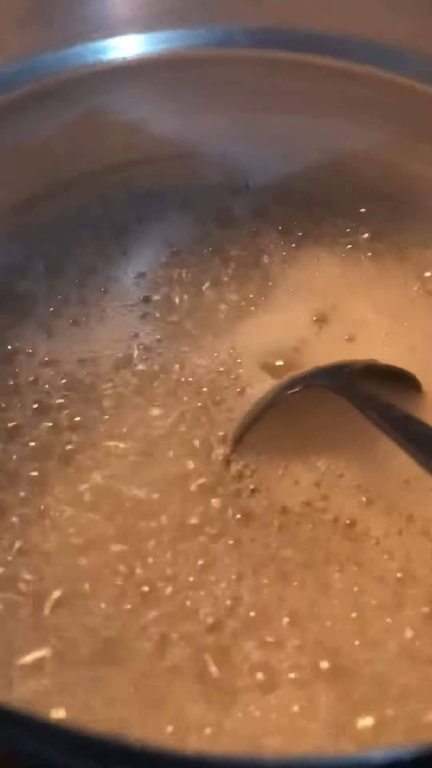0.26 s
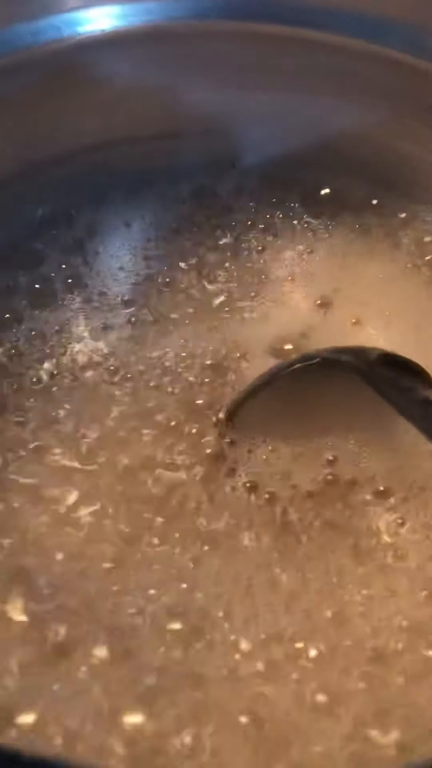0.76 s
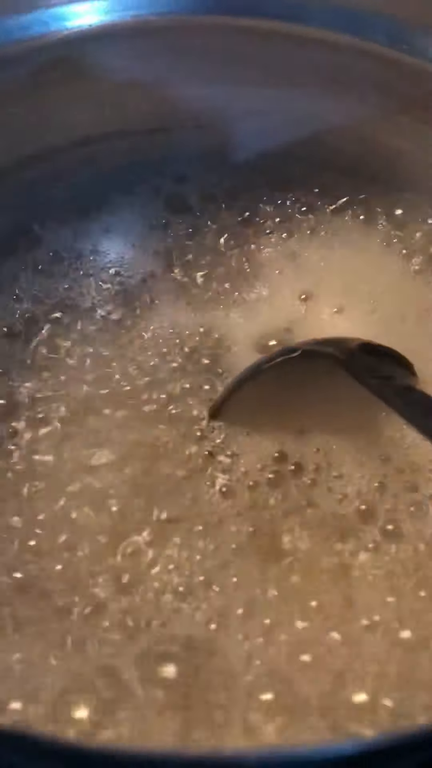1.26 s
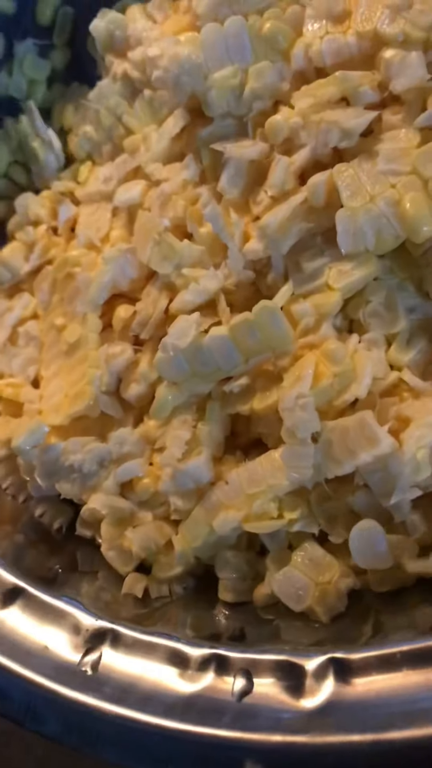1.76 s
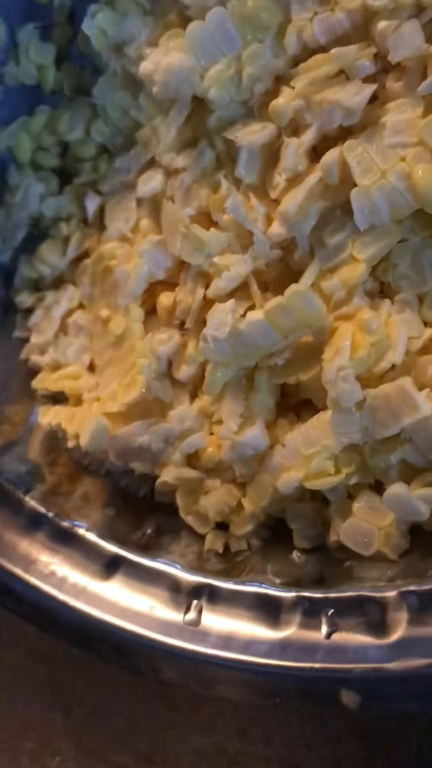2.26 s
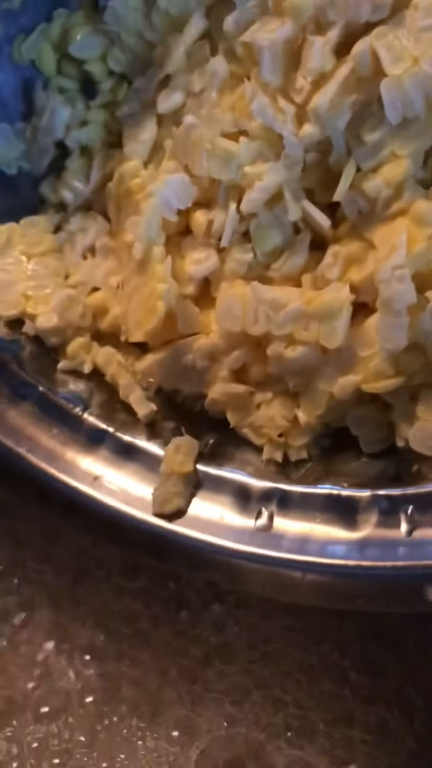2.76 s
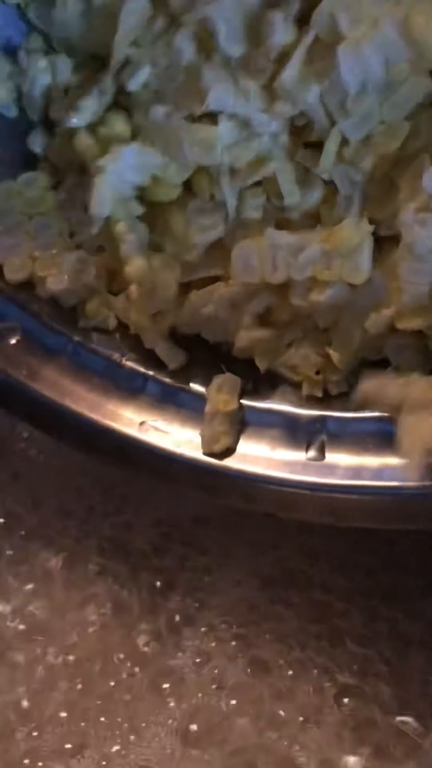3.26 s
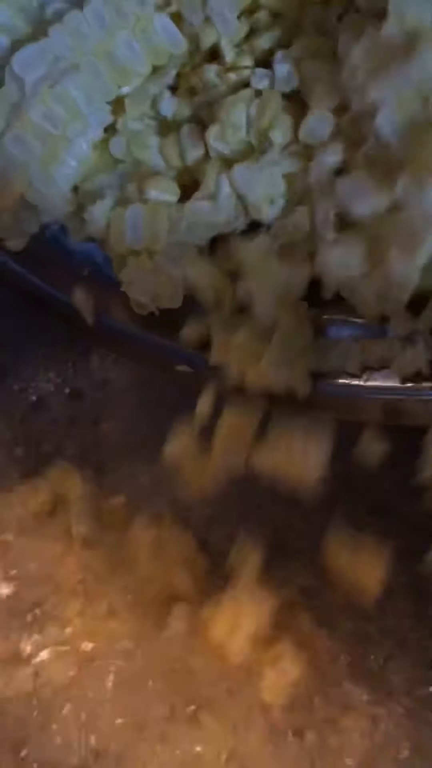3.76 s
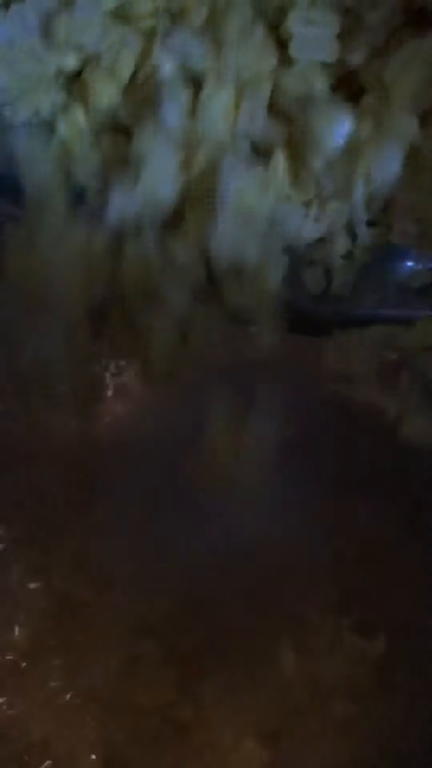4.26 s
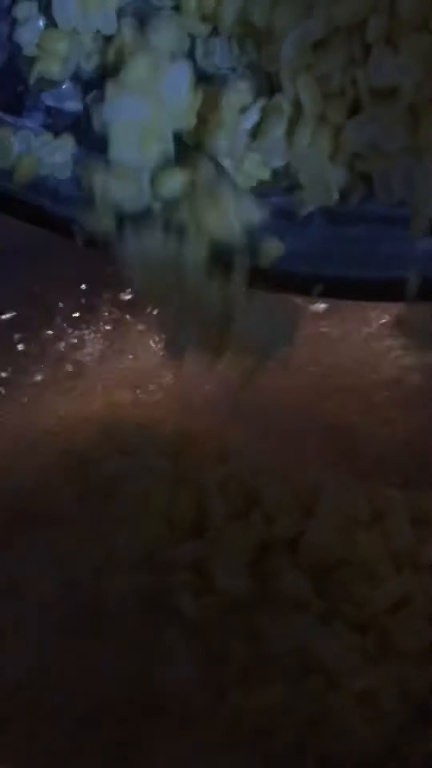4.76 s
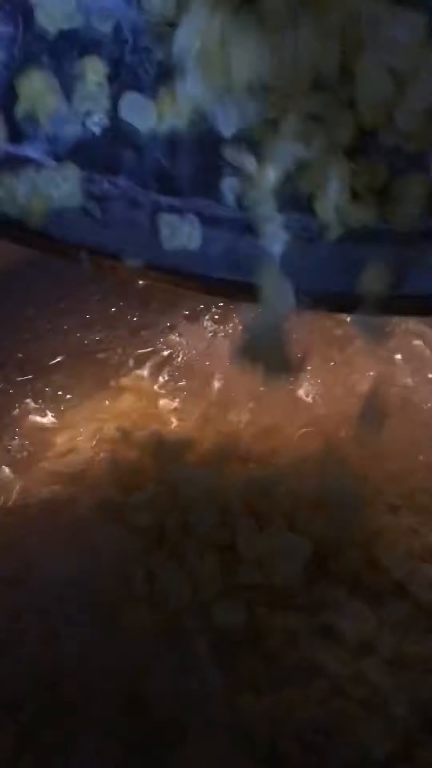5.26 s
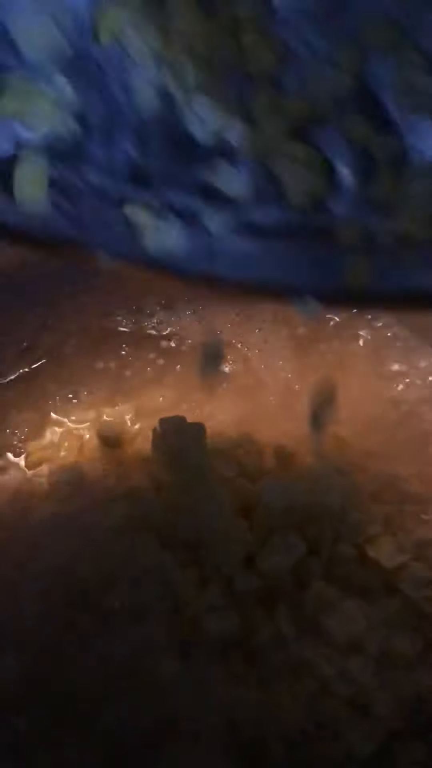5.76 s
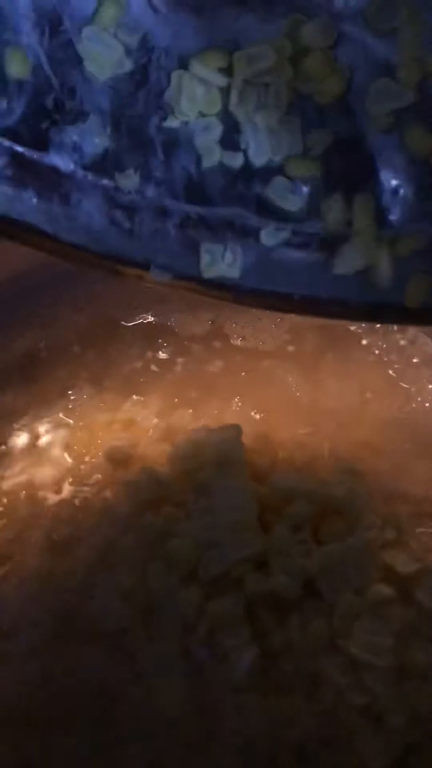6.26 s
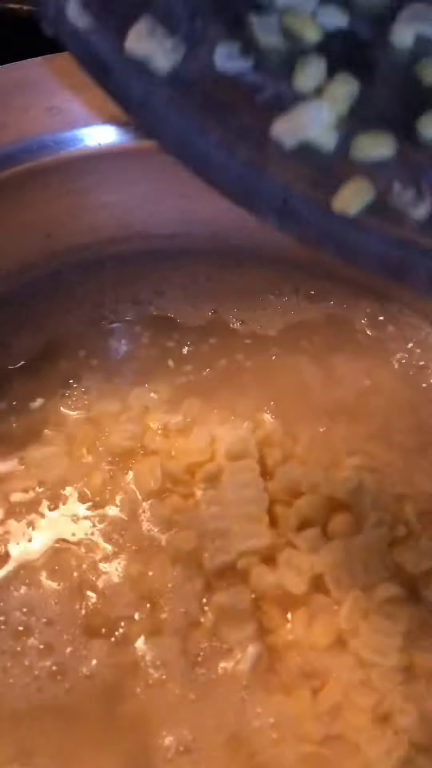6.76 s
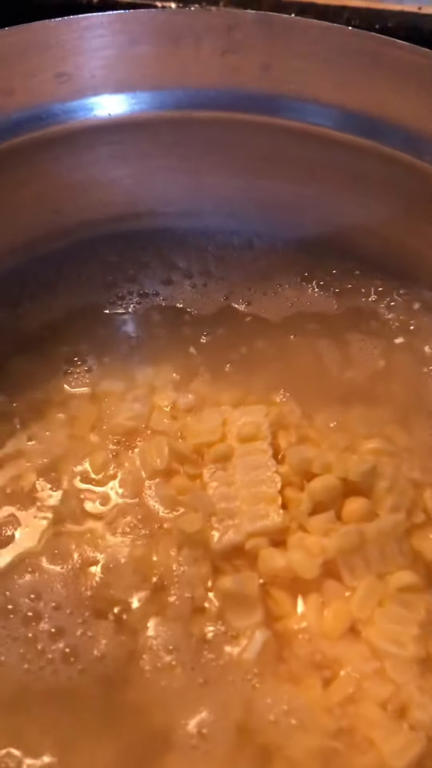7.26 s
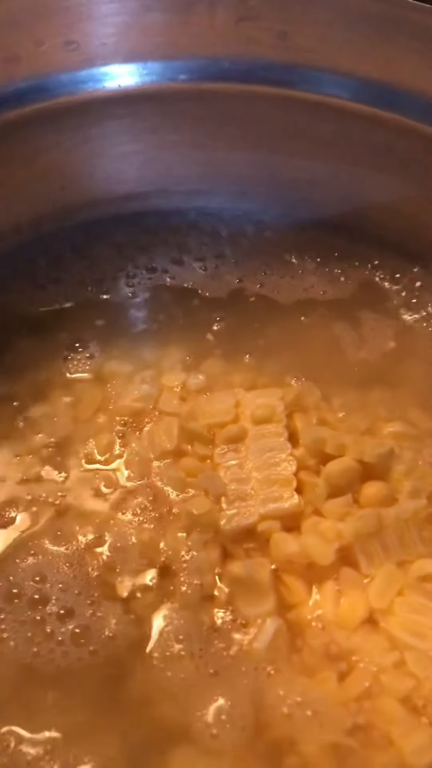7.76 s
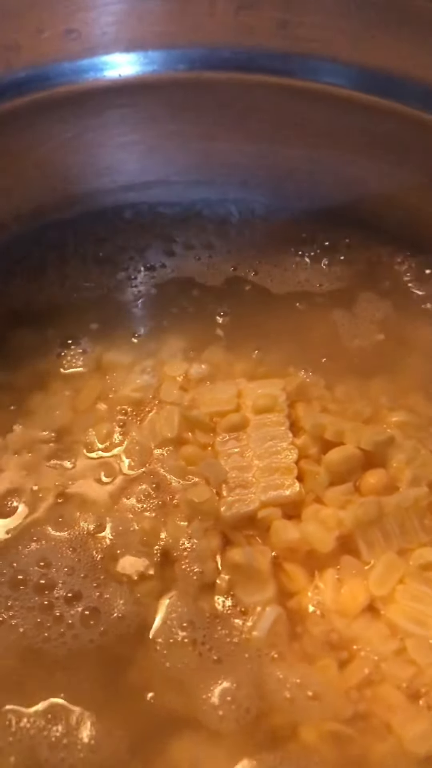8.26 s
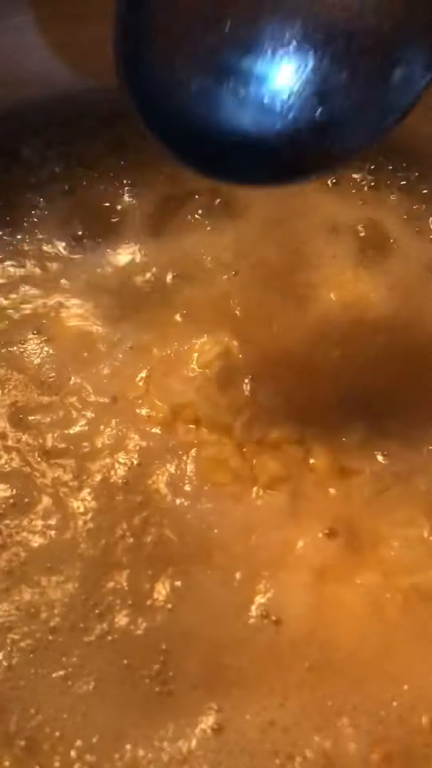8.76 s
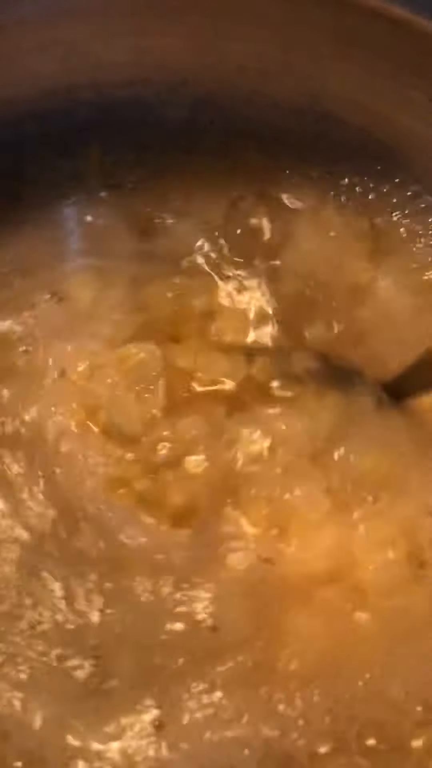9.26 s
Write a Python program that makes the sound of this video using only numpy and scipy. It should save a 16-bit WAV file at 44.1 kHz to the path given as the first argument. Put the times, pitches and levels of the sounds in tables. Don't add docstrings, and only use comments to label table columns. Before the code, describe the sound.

Water simmers and fizzes in a steel pot over a rumbling burner; corn plops in, an emptied metal bowl clangs three times on the rim, a ladle gulps.

```python
import sys
import numpy as np
from scipy import signal
from scipy.fft import rfft, irfft
from scipy.io import wavfile
from scipy.ndimage import uniform_filter1d, map_coordinates

SR = 44100
rng = np.random.default_rng(int(sys.argv[2]) if len(sys.argv) > 2 else 0)


def digitize_waveform(pressure):
    field = np.atleast_2d(pressure).T
    bounded = np.clip(field, -1, 1)
    quanta = np.round(bounded * 32767).astype(np.int16)
    wavfile.write(sys.argv[1], SR, quanta)


def field_ratio(decibels):
    return 10 ** (np.asarray(decibels, dtype=float) / 20)


N = 419832

# time in seconds, place
POT_COVER = [(0, 1), (1.33, -0.5), (1.34, 1.5), (2.6, 1.5), (3.3, 2.5), (4.3, 2), (5.2, 2.5), (6.4, 3),
             (6.8, 3.35), (7.2, 4), (8.5, 4), (8.55, 4.5), (9.1, 5), (9.52, 5)]
# frequency in Hz, density in dB per Hz.
OPEN_COLOUR = [(240, -45), (400, -29), (470, -22), (555, 1), (630, -26), (708, 3), (800, -9), (1300, -11.5),
               (2100, -8.5), (2600, -7), (3340, -5), (4970, -10), (6500, -13.5), (8450, -38), (14300, -120)]
FULL_BOWL_COLOUR = [(240, -54), (400, -19), (542, -10.5), (778, -4.5), (864, -13), (1070, -18),
                    (1280, -12.5), (1800, -17.5), (1950, -16.5), (2560, -13.5), (4800, -11), (5460, -15),
                    (6500, -9), (8450, -51), (14300, -120)]
TIPPING_COLOUR = [(240, -56), (400, -15), (548, 0.5), (742, -4), (971, -12), (1090, -17.5), (1530, -5.5),
                  (2050, -8), (2300, -10), (4420, -8.5), (4860, -16), (5330, -8.5), (6500, -16.5),
                  (8450, -37), (14300, -120)]
EMPTY_BOWL_COLOUR = [(240, -41), (400, -26), (530, -0.5), (680, -7), (900, -4.5), (1020, -9.5), (1250, -19),
                     (1500, -9), (1740, -10), (1950, -17.5), (2150, -14.5), (2300, -6), (2440, -4),
                     (3850, -4.5), (5460, -10), (6500, -12), (8450, -34), (14300, -120)]
FILLED_COLOUR = [(240, -45), (400, -26), (480, -7.5), (560, -8.5), (720, -4.5), (1100, -8.5), (1480, -8),
                 (1680, -1.5), (1900, -7), (2200, -9.5), (2480, -0.5), (2750, -5), (3300, -0.5),
                 (5000, -5.5), (6500, -8.5), (8450, -16), (14300, -120)]
STIRRED_COLOUR = [(240, -50), (400, -28), (523, -2.5), (623, -6.5), (717, -1.5), (1310, -8), (1820, -0.5),
                  (2530, -2), (3050, -4), (3380, -4.5), (6500, -9), (8450, -39), (14300, -120)]
# frequency in Hz, density in dB per Hz.
FIZZ_COLOUR = [(3240, -38), (5500, -10.5), (7060, -6), (7590, -8.5), (8640, -4), (10400, -8.5),
               (11700, -2.5), (14800, 2.5), (15400, 6), (16000, -13.5)]
# frequency in Hz, density in dB per Hz.
FLAME_COLOUR = [(15, -40), (25, -2), (48, -4.5), (119, -1), (139, -1.5), (161, -16), (223, -8.5), (281, -9),
                (353, -17), (380, -18), (450, -32.5), (580, -53), (990, -120)]
# frequency in Hz, density in dB per Hz.
SHADED_FLAME_COLOUR = [(15, -52), (25, -4), (97, -23), (125, 2), (171, -14), (258, -14), (288, -10),
                       (409, -31.5), (450, -23), (580, -48), (990, -120)]
# time in seconds, level in dB.
WATER_LEVEL = [(0, -51), (0.7, -49), (1.32, -46.5), (1.35, -56.5), (1.7, -55.5), (2.4, -54.5),
               (2.72, -53.5), (2.75, -52), (3.5, -48.5), (4.3, -50), (5.3, -52), (5.72, -50.5), (6.3, -50),
               (6.75, -51.5), (7.4, -47.5), (8.5, -48), (8.56, -47.5), (9.52, -44.5)]
# place as in the cover, level in dB.
FOAM_OVER_SIMMER = [(-.5, 2), (.5, 2.5), (1.5, 2.5), (2.5, 3.5), (3, 2.5), (3.4, 5.5), (4, 2.5), (5, 5)]
# place as in the cover, level in dB.
FLAME_LEVEL = [(-.5, -47), (.5, -50.5), (1.5, -56), (2, -49.5), (3, -50.5), (4, -51), (5, -49)]
# time in
# seconds, change # in dB (negative for a lull), length in seconds.
SHAKE_SWELLS = [(0.237, 2.5, 0.12), (2.63, 3, 0.14), (3.658, 2.5, 0.1), (3.763, 5, 0.18), (4.074, 3, 0.075),
                (4.195, -1, 0.037), (4.3, 2, 0.073), (4.508, 5.5, 0.14), (4.77, 7, 0.1), (5.036, 6.5, 0.13),
                (5.354, 2.5, .06), (5.478, 3, 0.14), (3.38, -2.5, .07), (8.41, 3, .07), (8.647, 3, 0.15),
                (8.985, -1, .08), (9.145, 1.5, 0.034)]
# start in seconds, peak in dB, thud in dB, crack in dB, favoured note in Hz.
RIM_KNOCKS = [
    (5.7483, -14.5, -6, -1, 1530),
    (5.7664, -5, -15, -9.5, 1448),
    (5.7894, -30, -5, -20, 1480),
    (5.9325, -9, -27, -3, 1496),
    (5.9404, -4, -8, -6, 1600),
    (5.9645, -34, -15, -20, 1470),
    (6.1203, -11, -21, -10, 1590),
    (6.1253, -12.5, -4, -6.5, 1450),
    (6.144, -26, -2, -20, 2330),
]
# frequency in Hz, level in dB, t60 in seconds.
BOWL_WALL = [(1374, -3, 0.056), (1496, 5, 0.05), (1560, -4, 0.065), (1645, -3.5, 0.034), (2240, -4, 0.044),
             (2330, 3, 0.026), (2590, -5, 0.038), (3324, -6, 0.037), (3700, 1, 0.016), (4040, 1, 0.015),
             (4600, -6, 0.025), (6750, 0, 0.019), (7450, 1.5, 0.016)]
# frequency in Hz, level in dB, t60 in seconds.
BOWL_RIM = [(385, -4.5, 0.17), (498, 4, 0.031), (546, -1.5, 0.11), (622, 1.5, 0.026), (740, -3, 0.028),
            (986, 4, 0.046), (1104, 6, 0.034)]
# frequency in Hz, level in dB, t60 in seconds.
POT_MODES = [(68.4, -13.5, 0.29), (127.4, -18, 0.27), (174, -1, 0.071), (200.4, 2, 0.1), (272, -4, 0.062)]
# start in seconds, peak in dB, frequency in Hz, t60 in seconds.
BOWL_PEALS = [(5.7495, -24, 1500, .02), (5.7515, -20, 1650, .06), (5.7665, -18, 4030, .012),
              (5.9325, -17, 4350, .012), (5.9405, -22, 388, .09), (5.9435, -20, 205, .08),
              (5.782, -36, 560, .08), (5.9405, -20, 545, .05), (5.9415, -21, 7200, .015),
              (5.9415, -21, 6000, .012), (5.978, -31, 540, .06), (5.7495, -27, 2700, .025),
              (5.7665, -18, 530, .035), (5.767, -13, 1500, .03), (5.767, -17, 1770, .015),
              (5.7705, -10.5, 1380, 0.048), (5.8, -42, 2500, .12), (5.815, -39, 1485, .08),
              (5.795, -34, 1450, .05), (5.9345, -13, 1560, .035), (5.934, -20, 1100, .03),
              (5.9422, -7, 1575, .022), (5.941, -17, 2670, 0.05), (5.9438, -18, 1750, 0.021),
              (5.9497, -18, 1420, 0.039), (5.965, -27, 1450, .05), (5.99, -35, 1560, .08),
              (6.002, -37, 1500, .12), (5.96, -34, 2620, .08), (6.121, -13.5, 1568, 0.038),
              (6.122, -21, 962, .045), (6.135, -28, 1480, .03), (6.143, -25, 1500, .04),
              (6.157, -36, 1500, .14), (6.19, -50, 2550, .08), (6.236, -45, 1480, 0.092),
              (6.245, -47, 960, .08), (6.41, -49, 1480, 0.1)]
# start in seconds, peak in dB, frequency in Hz,
# t60 in seconds.
POT_THROBS = [(5.782, -20.5, 126, 0.22), (5.835, -26, 124, .15), (5.949, -16, 123.6, 0.15),
              (6.06, -33, 110.6, 0.22), (6.128, -26, 66, 0.21), (6.205, -34, 121, .15),
              (3.745, -32.5, 129, .1), (3.82, -37, 129, 0.093), (4.509, -40, 130, .08),
              (4.59, -39, 194, 0.094), (9.225, -35.5, 126, 0.14), (9.285, -42, 125, 0.13)]
# start in seconds, tick in dB, slap in dB, slap frequency in Hz.
KERNEL_HITS = [(2.68, -44, -43, 1000), (4.0013, -28, -36, 5000), (4.446, -34, -42, 1600),
               (4.481, -34, -42, 2580), (3.7108, -22, -45, 8000), (3.7522, -32, -50, 8000),
               (3.724, -36, -40, 6000), (3.625, -22, -43, 5000), (3.6398, -24, -35.5, 1670),
               (3.6646, -35, -46, 1620), (3.7022, -31, -37, 1940), (3.709, -20, -44, 8000),
               (3.713, -28, -27.5, 4080), (3.721, -42, -36, 2300), (3.7494, -23, -46, 8060),
               (3.7614, -29, -45, 2970), (3.7824, -27, -32, 5080), (3.7874, -24, -36, 8370),
               (3.795, -19, -33, 4000), (3.822, -31, -48, 1850), (3.8556, -25, -43, 6230),
               (3.8612, -29, -42, 2450), (3.8806, -27, -56, 2320), (3.958, -36, -38, 2800),
               (4.0035, -14, -27.5, 3000), (4.0043, -30, -27, 7000), (6.183, -40, -39, 8000),
               (4.1045, -26, -39, 5570), (4.1154, -40, -43, 1530), (4.497, -29, -50, 2560),
               (4.5232, -16, -33, 1670), (4.556, -27, -46, 1510), (4.568, -25, -33, 3240),
               (5.8568, -34, -39, 7000), (6.214, -39, -47, 2500), (9.157, -32.5, -38, 1500),
               (9.17, -38, -41, 2200), (3.644, -36, -39, 2200), (3.686, -38, -41, 2000),
               (3.692, -38, -41, 2600), (3.727, -40, -41, 1800), (3.745, -40, -43, 2400),
               (3.766, -40, -43, 2500), (4.097, -36, -38, 5000), (4.111, -36, -42, 5500),
               (9.185, -40, -42, 2300)]
# centre in seconds, level in dB,
# length in seconds, centre frequency in Hz.
SPLASH_BURSTS = [(2.686, -52, 0.022, 680), (3.611, -51, 0.011, 550), (3.639, -43, 0.014, 550),
                 (3.683, -48, 0.015, 580), (3.714, -45, 0.016, 640), (3.795, -47, .01, 696),
                 (3.866, -48, .015, 590), (3.897, -48.5, .008, 470), (4.009, -47, 0.0088, 580),
                 (4.114, -47, .008, 570), (4.365, -49, 0.021, 650), (4.454, -53, 0.018, 1900),
                 (4.525, -46, .01, 680), (4.9, -47, 0.018, 550), (4.72, -56, 0.018, 540),
                 (5.0, -57, .01, 600), (5.195, -49, 0.0088, 700), (9.174, -50, 0.015, 920),
                 (9.418, -56, 0.053, 570), (3.697, -55, .07, 2100), (3.72, -51, 0.11, 610),
                 (9.32, -55, .04, 2110), (9.24, -55, 0.016, 260), (9.185, -44.5, 0.018, 286),
                 (4.521, -53.5, 0.073, 4100), (2.69, -52, .015, 320), (2.69, -56, .015, 1500),
                 (9.165, -50, .018, 2300), (9.155, -50, .006, 800), (9.49, -56, .04, 250),
                 (9.44, -53.5, .08, 1930), (9.12, -53, .04, 3100), (3.64, -52, .015, 2500)]
# start in seconds, peak in dB, frequency in Hz,
# decay in cycles.
LONE_TONES = [(0.138, -30, 74, 1.3), (1.64, -50.5, 1260, 32), (5.286, -45, 1490, 30),
              (5.0067, -42, 2360, 14), (5.3514, -44, 2690, 14), (4.8, -43, 2670, 14),
              (5.543, -45, 2690, 14), (6.327, -47, 1720, 16), (5.196, -44, 1600, 10),
              (5.148, -44, 3000, 8), (5.193, -41, 3000, 8), (4.78, -46, 1700, 20), (4.835, -49, 1500, 40),
              (9.46, -42, 690, 8), (9.5, -44, 780, 5), (5.35, -47, 1500, 20), (5.415, -47.5, 1480, 55),
              (4.004, -28.5, 1760, 5.7), (3.9575, -33, 2500, 4), (3.9578, -33, 3700, 5),
              (4.0035, -33, 2900, 5), (3.713, -32, 4000, 6), (3.7875, -37, 5700, 7),
              (5.886, -44, 2600, 30), (5.148, -40, 2530, 14), (5.19, -35.5, 2530, 22),
              (5.921, -38, 2650, 16), (6.327, -43, 1450, 39), (7.2, -49, 1740, 14), (6.37, -47, 1500, 35),
              (6.37, -44, 2400, 16), (6.37, -48, 1800, 10), (4.522, -41, 970, 12),
              (8.557, -33, 2100, 4.6), (8.561, -32.5, 1800, 6), (8.624, -31, 1800, 4.3),
              (9.154, -29, 289, 9.9), (9.172, -37, 250, 6.6), (9.146, -33, 1710, 6.8),
              (4.5, -40, 544, 5.8), (3.709, -34, 520, 6.2), (4.441, -39, 970, 34), (5.1, -46, 1600, 40),
              (4.481, -42, 3000, 25), (4.355, -51, 720, 14), (5.46, -46, 1520, 14), (6.21, -37, 580, 7.3),
              (4.003, -29, 750, 3), (5.1, -44, 2700, 14), (5.455, -40, 2620, 14)]
# time in seconds, level in dB.
SLIDE_LEVEL = [(4.1, -75), (4.3, -64), (4.44, -58.5), (4.9, -58), (5.6, -60), (5.74, -66), (5.76, -100)]
# frequency in Hz, width in Hz, level in dB,
# change in dB as the bowl empties.
SLIDE_NOTES = [(970, 71, -2.5, -2), (1500, 140, -1.5, -11), (2450, 300, 0.5, 1)]
# cut in seconds, length of the old scene's remnant in seconds,
# new scene full at in seconds, its fade-in in seconds.
SCENE_JOINS = [
    (1.32, .016, 1.37, .033),
    (2.727, .02, 2.752, .036),
    (8.49, .034, 8.547, .005),
]


def unit(x):
    return x / np.sqrt(np.mean(x ** 2) + 1e-20)


def along(points, hz):
    f, v = np.transpose(points)
    return np.interp(np.log(hz + 1), np.log(f + 1), v)


def curves(rows, t):
    s, *cols = np.transpose(rows)
    return [np.interp(t, s, c) for c in cols]


def wobble(rate):
    knots = rng.standard_normal(int(N * rate / SR) + 4)
    return map_coordinates(knots, [np.arange(N) * rate / SR])


def band(x, lo_hz, hi_hz):
    return signal.sosfilt(signal.butter(2, [lo_hz, hi_hz], "band", fs=SR, output="sos"), x)


def add(track, s, sound):
    track[round(s * SR):][:len(sound)] += sound


def coloured(x, spectra, place, patchy_db, size=1024):
    hz, t, z = signal.stft(x, SR, nperseg=size)
    shapes = np.array([along(s, hz) for s in spectra])
    shapes -= 10 * np.log10(np.mean(10 ** (shapes / 10), axis=1, keepdims=True))
    distance = abs(curves(place, t)[0] - np.arange(len(spectra))[:, None])
    share = np.clip(1 - distance, 0, 1)
    field = uniform_filter1d(rng.standard_normal(z.shape), size=9, axis=0)
    field = uniform_filter1d(field, size=5, axis=1)
    gain = field_ratio(shapes.T @ share + patchy_db * unit(field))
    return unit(signal.istft(z * gain, SR, nperseg=size)[1][:N])


def grains(count, hz, spread, cycles, size):
    when, loud = rng.random(count), rng.random(count) ** 3
    pitch = np.clip(hz * np.exp(spread * rng.standard_normal(count)), 300, 17000)
    turns = pitch[:, None] * np.arange(size) / SR
    shape = loud[:, None] * np.sin(2 * np.pi * turns) * np.exp(-turns / cycles)
    at = (when * N).astype(int)[:, None] + np.arange(size)
    return unit(np.bincount(at.ravel(), shape.ravel(), N + size)[:N])


def ring(modes, t, rise, note_hz=0, turn=1):
    hz, db, t60 = np.transpose(modes)[:, :, None]
    level = db + 2.0 * rng.standard_normal(hz.shape) + 4 * np.exp(-((hz - note_hz) / 60) ** 2)
    phase = 2 * np.pi * turn * rng.random(hz.shape)
    tones = field_ratio(level - 60 * t / t60) * np.sin(2 * np.pi * hz * t + phase)
    return np.sum(tones, axis=0) * (1 - np.exp(-t / rise))


def puff(t, lo_hz, hi_hz, t60, rise=0.00016):
    envelope = field_ratio(-60 * t / t60) * (1 - np.exp(-t / rise))
    burst = band(rng.standard_normal(len(t)) * envelope, lo_hz, hi_hz)
    return burst / abs(burst).max()


def shakes_db(t):
    rise_over_fall = 0.46
    swell = 0
    for s, db, length in SHAKE_SWELLS:
        side = length * np.where(t < s, rise_over_fall, 1)
        swell = swell + db * np.exp(-((t - s) / side) ** 2)
    return swell


def simmering_water():
    t = np.arange(N) / SR
    level_db, place, swell_db = curves(WATER_LEVEL, t)[0], curves(POT_COVER, t)[0], shakes_db(t)
    surge = wobble(14)
    simmer_db = level_db + 0.41 * swell_db + 0.21 * wobble(4.2) + 0.65 * surge
    fizz_db = level_db + curves(FOAM_OVER_SIMMER, place)[0] + swell_db
    fizz_db = fizz_db + 0.12 * wobble(5.7) + 0.92 * surge + 0.79 * wobble(48)
    water = 1.87 * rng.standard_normal(N)
    water += 0.27 * grains(count=16000, hz=2760, spread=0.68, cycles=1.7, size=160)
    colours = [OPEN_COLOUR, FULL_BOWL_COLOUR, TIPPING_COLOUR, EMPTY_BOWL_COLOUR, FILLED_COLOUR, STIRRED_COLOUR]
    simmer = coloured(water, colours, POT_COVER, patchy_db=0.85)
    foam = 1.4 * rng.standard_normal(N)
    foam += 0.35 * grains(count=60000, hz=11300, spread=0.32, cycles=1.7, size=40)
    fizz = coloured(foam, [FIZZ_COLOUR], [(0, 0.026)], patchy_db=1.55)
    return field_ratio(simmer_db) * simmer + field_ratio(fizz_db) * fizz


def knocks():
    out, t = np.zeros(N + SR), np.arange(SR // 2) / SR
    for s, db, thud_db, crack_db, note_hz in RIM_KNOCKS:
        wall = field_ratio(db - 14.5) * ring(BOWL_WALL, t, rise=0.00066, note_hz=note_hz, turn=0.46)
        rim = field_ratio(-24.5 + 0.59 * db) * ring(BOWL_RIM, t, rise=0.00088)
        thud = field_ratio(db + thud_db - 4) * ring(POT_MODES, t, rise=0.0017, turn=0)
        crack = field_ratio(-6) * puff(t, 3300, 9800, t60=0.02)
        crack += field_ratio(-1.5) * puff(t, 11200, 17100, t60=0.017, rise=0.00022)
        crack += field_ratio(-13) * puff(t, 12000, 16000, t60=0.081)
        clank = field_ratio(db - 12.0) * puff(t, 500, 4800, t60=0.048)
        hum = field_ratio(db - 28.5) * puff(t, 1400, 1680, t60=0.5)
        hum += field_ratio(db - 33) * puff(t, 2440, 2720, t60=0.25)
        rattle = field_ratio(db - 24) * puff(t, 95, 1700, t60=0.39)
        shudder = field_ratio(db - 31.5) * puff(t, 40, 155, t60=1.3, rise=0.051)
        add(out, s, wall + rim + thud + field_ratio(db + crack_db) * crack + clank + hum + rattle + shudder)
    return out[:N]


def peals():
    out, t = np.zeros(N + SR), np.arange(SR // 4) / SR
    rise_s = 0.0014
    for s, db, hz, t60 in BOWL_PEALS:
        envelope = field_ratio(db + 0.5 - 60 * t / t60) * (1 - np.exp(-(t / rise_s) ** 2))
        add(out, s, envelope * np.sin(2 * np.pi * hz * t))
    return out[:N]


def throbs():
    out, t = np.zeros(N + SR), np.arange(SR // 2) / SR
    rise_s = 0.0081
    for s, db, hz, t60 in POT_THROBS:
        envelope = field_ratio(db + 1.5 - 60 * t / t60) * (1 - np.exp(-(t / rise_s) ** 2))
        add(out, s, envelope * np.sin(2 * np.pi * hz * t))
    return out[:N]


def kernels():
    out, t = np.zeros(N + SR), np.arange(SR // 10) / SR
    for s, tick_db, slap_db, hz in KERNEL_HITS:
        tick = field_ratio(tick_db - 0.5) * puff(t, 11500, 21200, t60=0.012, rise=0.00052)
        slap = field_ratio(slap_db + 3.5) * puff(t, .5 * hz, 2 * hz, t60=0.0091, rise=0.00026)
        plop = field_ratio(-42 + 0.39 * slap_db) * puff(t, 530, 790, t60=0.074)
        add(out, s, tick + slap + plop)
    return out[:N]


def splashes():
    out, t = np.zeros(N + SR), np.arange(-SR // 5, SR // 5) / SR
    wide = 1.32
    for s, db, length, hz in SPLASH_BURSTS:
        drops = rng.standard_normal(len(t)) * (rng.random(len(t)) < .05)
        patter = unit(band(drops, hz / wide, hz * wide))
        add(out, s + t[0], field_ratio(db) * patter * np.exp(-(t / length) ** 2))
    return out[:N]


def lone_tones():
    out, t = np.zeros(N + SR), np.arange(SR // 5) / SR
    for s, db, hz, cycles in LONE_TONES:
        age = t * hz / cycles
        tone = np.sin(2 * np.pi * hz * t * (1 + 0.0085 * age))
        add(out, s, field_ratio(db + 3.0) * tone * (1 - np.exp(-8.5 * age)) * np.exp(-2.2 * age))
    return out[:N]


def slide():
    t = np.arange(N) / SR
    level_db = np.where(t < SLIDE_LEVEL[0][0], -120, curves(SLIDE_LEVEL, t)[0]) + 0.43 * shakes_db(t)
    empty = np.interp(t, (4.78, 5.5), [0, 1])
    note_rise = 0.051
    taps = rng.standard_normal(N) * (rng.random(N) < .04)
    out = np.zeros(N)
    for hz, width, db, change_db in SLIDE_NOTES:
        high_hz = hz * (1 + note_rise)
        full_note = unit(band(taps, hz - width / 2, hz + width / 2))
        empty_note = unit(band(taps, high_hz - width / 2, high_hz + width / 2))
        gain = field_ratio(level_db + db + change_db * empty + 1.3 * wobble(21.96))
        out += gain * (np.sqrt(1 - empty) * full_note + np.sqrt(empty) * empty_note)
    return out


def flame():
    place = curves(POT_COVER, np.arange(N) / SR)[0]
    level_db = curves(FLAME_LEVEL, place)[0] + 1.04 * wobble(8) + 0.9 * wobble(25)
    colours = [FLAME_COLOUR, SHADED_FLAME_COLOUR] + 4 * [FLAME_COLOUR]
    return field_ratio(level_db) * coloured(rng.standard_normal(N), colours, POT_COVER, patchy_db=-0.5, size=4096)


def joins():
    t, gain = np.arange(N) / SR, np.ones(N)
    for cut, lasts, full, fade in SCENE_JOINS:
        remnant = field_ratio(-20) * np.clip(1 - (t - cut) / lasts, 0, 1)
        fade_in = np.clip(1 - (full - t) / fade, 0, 1) ** 2.2
        gain = gain * np.where(t < cut, 1, np.maximum(remnant, fade_in))
    return gain


def scene():
    pot = simmering_water() + flame() + throbs()
    bowl = knocks() + peals() + slide()
    corn = kernels() + splashes() + lone_tones()
    return np.tile(pot + bowl + corn, (2, 1))


def band_limit(x):
    return signal.sosfilt(signal.butter(12, 16990, fs=SR, output="sos"), x)


def record(dry):
    heard = signal.sosfilt(signal.butter(4, 40, "high", fs=SR, output="sos"), dry)
    top_hz = 15950
    heard = irfft(rfft(heard) * (np.fft.rfftfreq(N, 1 / SR) < top_hz), N)
    heard = heard / (1 + abs(heard / .8) ** 4) ** .25
    return band_limit(heard * joins())


dry = scene()
out = record(dry)
digitize_waveform(out)
```